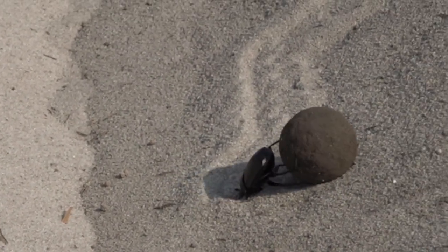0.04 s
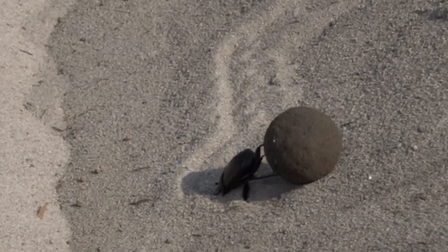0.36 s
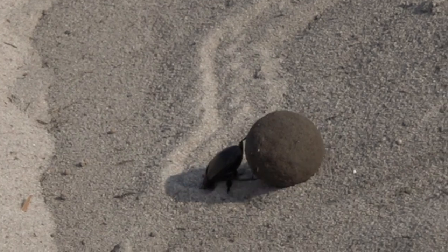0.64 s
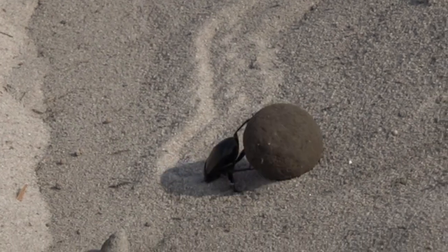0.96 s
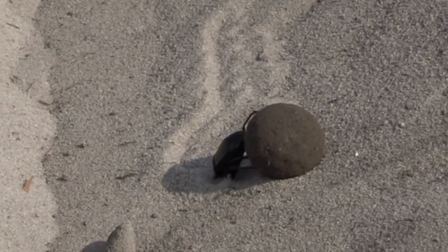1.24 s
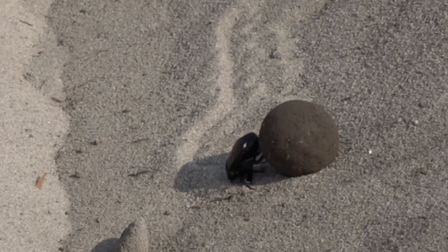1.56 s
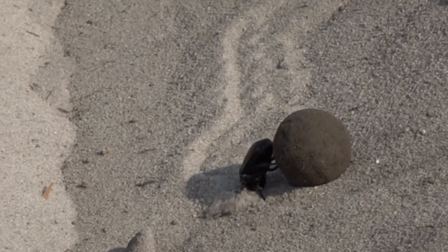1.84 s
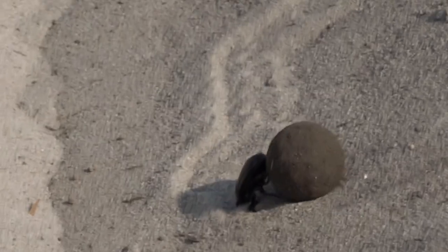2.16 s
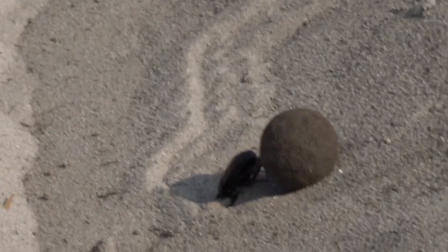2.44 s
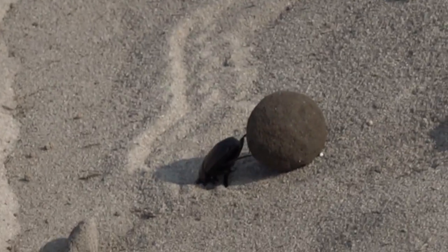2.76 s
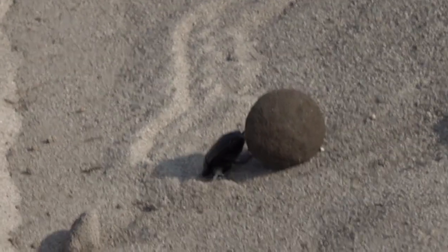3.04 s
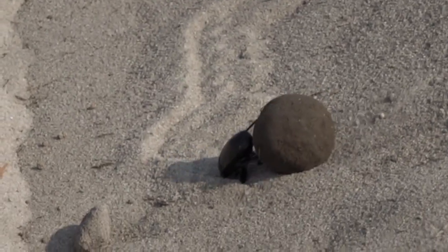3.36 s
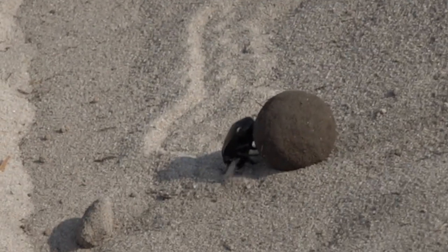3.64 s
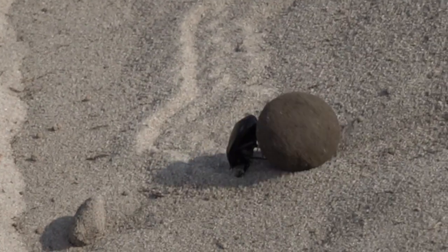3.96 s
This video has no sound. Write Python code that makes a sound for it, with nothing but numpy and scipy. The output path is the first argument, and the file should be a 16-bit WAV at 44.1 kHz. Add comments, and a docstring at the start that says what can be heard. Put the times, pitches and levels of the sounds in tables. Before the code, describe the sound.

Low gusts of wind rumble against a hand-held microphone outdoors. A lull reveals very faint distant chirps and a clicking rustle; the wind returns, with a second rustle, and swells into a brief roar before easing.

```python
"""Gusts on open sandy ground

A breezy day at a hand-held camera. Eddies buffet the microphone ports: a low, thumping rumble that
opens into a roar and crackles in the strongest gust. Handling adds two short rustles with small
clicks of the camera body. Behind them lie quiet air, a faint hiss and a few far bird chirps."""
import sys
import numpy as np
from scipy.fft import rfft, irfft, next_fast_len
from scipy.io import wavfile
from scipy.ndimage import uniform_filter1d, map_coordinates

SR = 44100
rng = np.random.default_rng(int(sys.argv[2]) if len(sys.argv) > 2 else 0)


def log_audio(samples):
    """Write samples as a 16-bit WAV file to the path given in sys.argv[1]."""
    # one column per channel
    frames = np.atleast_2d(samples).T
    # limit to full scale, then quantise
    limited = np.clip(frames, -1, 1)
    pcm = np.round(limited * 32767).astype(np.int16)
    wavfile.write(sys.argv[1], SR, pcm)


N = 176400

# colour of the wind's roar: f/Hz, relative level/dB
ROAR_COLOUR = [(30, -49), (70, -14.5), (150, 1.5), (260, 4.5), (490, -0.5), (720, -8), (1050, -18),
               (1600, -31.5), (3000, -48.5), (8000, -80)]
# stereo image of the roar: f/Hz, left-right likeness (-1..1)
ROAR_LIKENESS = [(100, 0.81), (250, -0.2), (480, -0.32), (950, -0.52), (2000, -0.49)]
# stereo image of air, hiss and handling noise: f/Hz, left-right likeness (-1..1)
AIR_LIKENESS = [(100, 1), (480, 0.89), (1000, 0.3), (2000, 0.94), (4000, 0.77), (8000, 0.14), (13000, 1)]


def amp(db):
    """Decibels as a gain."""
    return 10 ** (np.asarray(db) / 20)


def along(points, hz):
    """Read (f/Hz, value) points on a log frequency axis."""
    f, values = np.transpose(points)
    return np.interp(np.log(hz + 1), np.log(f + 1), values)


def curve(points):
    """Join (t/s, value) points, one value per sample."""
    return np.interp(np.arange(N) / SR, *np.transpose(points))


def wobble(rate):
    """A smooth random curve, rate knots a second."""
    return map_coordinates(rng.standard_normal(4096), [np.arange(N) * rate / SR], mode="wrap")


def swell(peak_s, db, rise_s, fall_s):
    """A rounded rise and fall of level around a peak."""
    t = np.arange(N) / SR - peak_s
    return amp(db) * np.exp(-np.abs(t / np.where(t < 0, rise_s, fall_s)) ** 3)


def decay(age, t60):
    """An envelope that falls 60 dB in t60 seconds."""
    return np.exp(-np.log(1000) * age / t60)


def filtered(x, response):
    """Shape x with a complex response of frequency."""
    size = next_fast_len(N + SR // 2)
    return irfft(rfft(x, size) * response(np.fft.rfftfreq(size, 1 / SR)), size)[..., :N]


def rush(colour, likeness):
    """Stereo noise of rms 1 with a given colour and left-right likeness."""
    def mid_side_gains(hz):
        width = np.arccos(np.clip(along(likeness, hz), -.99, .99)) / 2
        return amp(along(colour, hz)) * [np.cos(width), np.sin(width)]
    mid, side = filtered(rng.standard_normal((2, N)), mid_side_gains)
    stereo = np.array([mid + side, mid - side])
    return stereo / np.sqrt(np.mean(stereo ** 2) + 1e-20)


def steady(x, span_s):
    """Hold the slow level at 1, so that only the quick lumps remain."""
    power = uniform_filter1d(np.mean(x ** 2, axis=0), int(span_s * SR) + 1)
    return x / np.sqrt(np.abs(power) + 1e-12)


def panned(x, left_db):
    """Lean x to the left by left_db."""
    return x * amp(np.array([[left_db], [-left_db]]) / 2)


def air():
    """The quiet of the open land: a soft bed of noise, a little to the right."""
    # colour of still air: f/Hz, relative level/dB
    colour = [(20, -11), (75, -3), (160, -2), (330, -1), (520, 0), (1000, -5.5), (1500, -9.5), (1900, -8),
              (2300, -12), (3200, -15), (5200, -22.5), (7400, -25), (10000, -24), (15800, -29.5)]
    # phase between the channels: f/Hz, lead of the left/rad
    left_lead = [(150, 0.29), (500, -0.3), (1000, -0.71), (2000, -1.37), (6000, -0.74)]
    bed = rush(colour, AIR_LIKENESS)
    bed = filtered(bed, lambda hz: np.exp(1j * along(left_lead, hz) * np.array([[.5], [-.5]])))
    return bed * amp(-52.5 + 0.12 * wobble(5.54))


def hiss():
    """A faint high hiss that swells slowly and wavers."""
    # swell of the hiss: t/s, level/dB
    level = [(0, -69), (.9, -69.5), (1.6, -64.5), (4, -66)]
    # colour of the hiss: f/Hz, relative level/dB
    colour = [(1200, -25), (3000, -10.5), (5200, -1.5), (7200, -13.5), (10000, -29), (15000, -20.5)]
    return rush(colour, AIR_LIKENESS) * amp(curve(level) + .8 * wobble(19))


def bird():
    """Thin falling chirps, blurred by distance."""
    # far calls: t/s, length/s, start f/Hz, end f/Hz, level/dB, pitch blur/Hz
    chirps = [(1.485, .045, 6550, 6200, -65, 170), (1.608, .078, 5100, 4650, -58.5, 340),
              (1.615, .06, 3390, 3250, -63, 200), (1.705, .036, 6000, 5570, -64, 280),
              (1.842, .058, 4720, 4560, -64.5, 120)]
    track = np.zeros(N)
    for s, length, start_hz, end_hz, db, blur_hz in chirps:
        progress = np.linspace(0, 1, int(length * SR))
        hz = start_hz + (end_hz - start_hz) * progress + blur_hz * wobble(885)[:len(progress)]
        add(track, s, amp(db) * np.sin(np.pi * progress) * np.sin(2 * np.pi * np.cumsum(hz) / SR))
    return track


def add(track, s, sound):
    """Mix a sound into a track from s seconds on."""
    part = track[max(round(s * SR), 0):][:len(sound)]
    part += sound[:len(part)]


def handling():
    """Grainy rubbing swells and fades; each click is a burst of the same colour plus one short ring."""
    # rubs on the camera: peak t/s, level/dB, rise/s, fall/s
    rustles = [(2.039, -51, 0.064, 0.071), (3.002, -57.5, 0.083, 0.089)]
    # colour of rubs and cracks: f/Hz, relative level/dB
    colour = [(400, 2), (1300, 2), (2200, -4.5), (4000, -2.5), (5800, -7.5), (7800, -21), (10200, -10.5),
              (12500, -35), (16000, -34)]
    # knocks of the camera body: t/s, ring level/dB, ring f/Hz, ring t60/s, crack level/dB
    clicks = [(2.015, -41, 3370, .016, -61), (2.0348, -29, 1390, 0.018, -36), (2.087, -36, 848, 0.044, -51),
              (2.527, -38.5, 890, 0.028, -45.5), (2.53, -40, 4000, .01, -54), (2.977, -52, 4100, 0.02, -49),
              (2.999, -30.5, 1375, 0.026, -35), (3.009, -40, 4120, 0.019, -61)]
    grain = amp(2.2 * wobble(330))
    rub = sum(swell(*row) for row in rustles) * grain
    cracks, rings = np.zeros((2, N))
    age = np.arange(SR // 10) / SR
    onset = 1 - np.exp(-age / .0007)
    for s, ring_db, hz, t60, crack_db in clicks:
        add(rings, s, amp(ring_db) * onset * decay(age, t60) * np.sin(2 * np.pi * hz * age))
        add(cracks, s, amp(crack_db) * onset * decay(age, t60=0.042))
    return rings + rush(colour, AIR_LIKENESS) * np.hypot(rub, cracks)


def brush_and_scrape():
    """A soft, dull brushing leads into the second rustle; a thin scrape sits within it."""
    # colour of the brushing: f/Hz, relative level/dB
    brush_colour = [(400, -8), (1200, -3), (2600, -22), (9000, -31)]
    # colour of the scrape: f/Hz, relative level/dB
    scrape_colour = [(2400, -10.5), (4300, -4), (7500, -25), (12000, -60)]
    brush = rush(brush_colour, AIR_LIKENESS) * swell(peak_s=2.91, db=-53, rise_s=.075, fall_s=.08)
    scrape = rush(scrape_colour, AIR_LIKENESS) * swell(peak_s=3.003, db=-52, rise_s=.058, fall_s=.058)
    return brush + scrape


def crackle():
    """A few separate snaps while the wind is at its strongest."""
    # tiny snaps: t/s, peak level/dB, f/Hz
    snaps = [(3.541, -43, 5400), (3.558, -37, 3300), (3.570, -42, 3800), (3.625, -40, 3800),
             (3.636, -48, 3900), (3.646, -41, 2800)]
    rise_s = .00016
    track = np.zeros(N)
    age = np.arange(SR // 100) / SR
    envelope = age / rise_s * np.exp(1 - age / rise_s)
    for s, db, hz in snaps:
        add(track, s, amp(db) * envelope * np.sin(2 * np.pi * hz * age))
    return track


def thumps():
    """A sudden eddy gives one low, quickly damped push and a puff of roar."""
    # single eddies hitting the ports: t/s, level/dB, f/Hz, t60/s
    hits = [(0.212, -24.5, 83, 0.11), (0.465, -22.5, 127, 0.034), (0.743, -25, 222, 0.02),
            (1.413, -25, 200, 0.03), (2.464, -26.5, 99, 0.14), (2.498, -21.5, 152.4, 0.12),
            (2.827, -18.5, 88, 0.053), (3.003, -23, 125, 0.078), (3.303, -19, 250, 0.035),
            (3.5, -5.5, 235, 0.035), (3.518, -8.5, 165, .03), (3.567, -2, 362, 0.018),
            (3.705, -17, 292, 0.024), (3.894, -19, 197, 0.037)]
    rise_s, puff_db = 0.0023, -3
    pushes, puffs = np.zeros((2, N))
    age = np.arange(SR // 5) / SR
    onset = 1 - np.exp(-(age / rise_s) ** 2)
    for s, db, hz, t60 in hits:
        add(pushes, s, amp(db) * onset * decay(age, t60) * np.sin(2 * np.pi * hz * age))
        add(puffs, s, amp(db + puff_db) * onset * decay(age, t60=0.031))
    return panned(pushes + puffs * rush(ROAR_COLOUR, ROAR_LIKENESS), left_db=3.0)


def wind():
    """Eddies hit the ports in lumps; the roar grows faster with wind strength than the low buffeting."""
    # wind strength at the ports: t/s, level/dB
    gusts = [(0, -55), (.13, -45.5), (.22, -38.5), (.41, -39.5), (.485, -33), (.53, -37), (.62, -46),
             (.72, -39.5), (.92, -41), (1.05, -43.5), (1.14, -58.5), (1.24, -58), (1.29, -44.5),
             (1.35, -47), (1.425, -42), (1.52, -42), (1.64, -49), (1.78, -67), (2.42, -65), (2.475, -38),
             (2.55, -34), (2.63, -58), (2.74, -38), (2.8, -44.5), (2.835, -31), (2.91, -38.5), (2.99, -39),
             (3.015, -32), (3.21, -37.5), (3.24, -29.5), (3.285, -32.5), (3.33, -25.5), (3.45, -22.5),
             (3.48, -27.5), (3.535, -23), (3.568, -19), (3.61, -23.5), (3.72, -22.5), (3.765, -25),
             (3.805, -34.5), (3.87, -36.5), (3.9, -30), (4, -45)]
    # colour of the buffeting: f/Hz, relative level/dB
    buffet_colour = [(20, -28.5), (45, -3), (88, 1.5), (140, -6.5), (280, -10), (450, -17), (800, -56.5),
                     (1600, -57), (4000, -90)]
    # stereo image of the buffeting: f/Hz, left-right likeness (-1..1)
    buffet_likeness = [(50, 1), (120, 0.99), (250, 0.68), (500, 0.21)]
    reference_db, buffet_cap_db = -30, 4
    gust_db = curve(gusts) - reference_db
    eddies = wobble(105)  # shared by buffeting and roar
    buffet = rush(buffet_colour, buffet_likeness) * amp(eddies + 1.9 * wobble(48))
    roar = rush(ROAR_COLOUR, ROAR_LIKENESS)
    flutter = np.array([wobble(210), wobble(210)])  # each side has its own
    roar *= amp(2.94 * eddies + 0.97 * flutter)
    buffet = steady(buffet, span_s=0.084) * amp(-28.5 + 0.97 * np.minimum(gust_db, buffet_cap_db))
    roar = steady(roar, span_s=0.063) * amp(-32 + 1.715 * gust_db)
    return panned(buffet + roar, left_db=2.0)


def scene():
    """Wind and handling at the camera, air and bird far behind."""
    return wind() + thumps() + crackle() + air() + hiss() + handling() + brush_and_scrape() + bird()


def record(dry):
    """The camera keeps nothing above its band limit."""
    return filtered(dry, lambda hz: hz < 15780)


dry = scene()
out = record(dry)
log_audio(out)
```